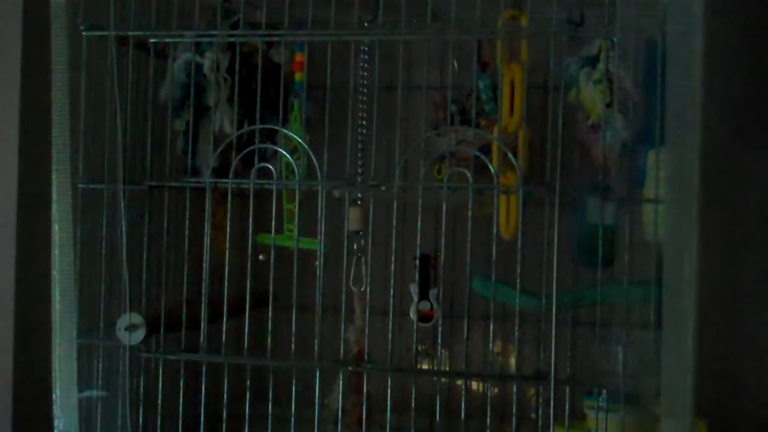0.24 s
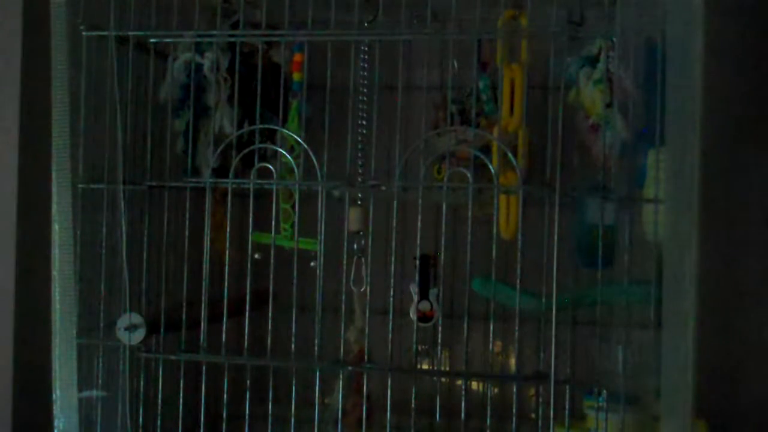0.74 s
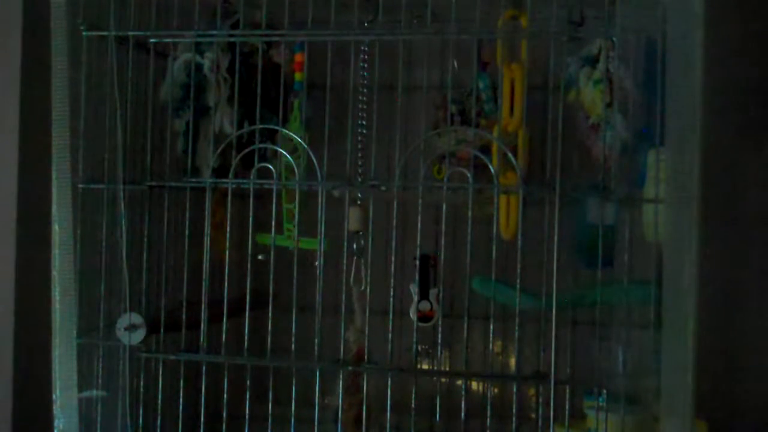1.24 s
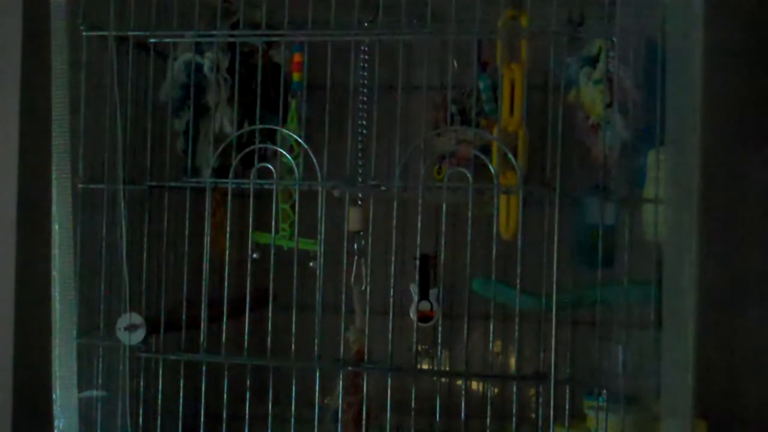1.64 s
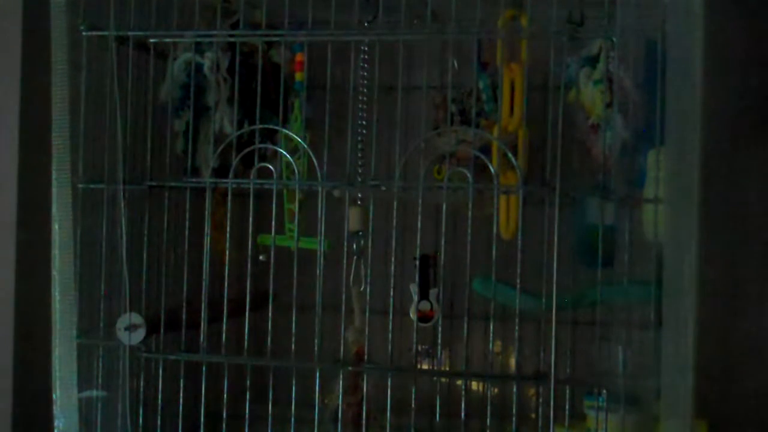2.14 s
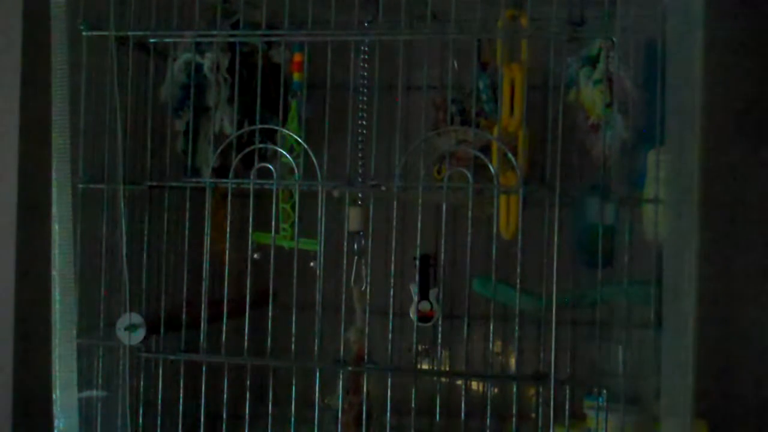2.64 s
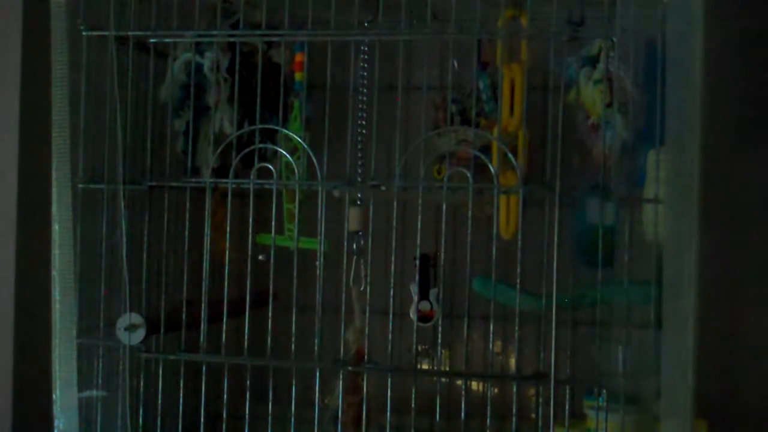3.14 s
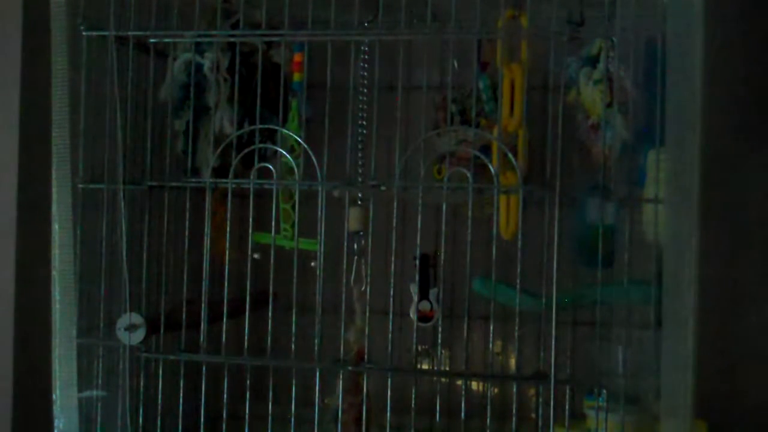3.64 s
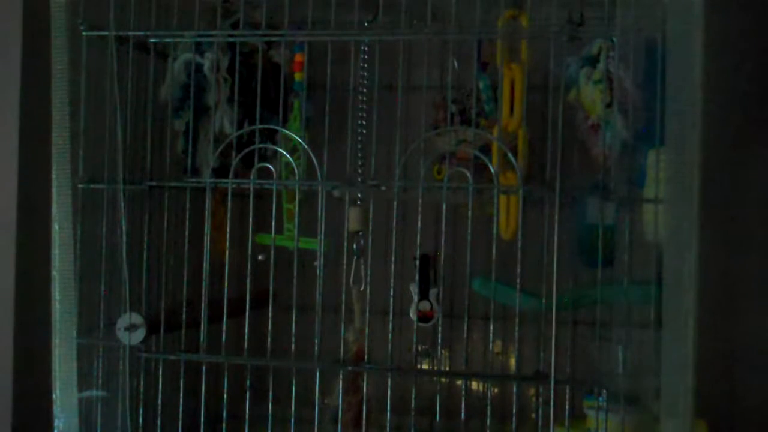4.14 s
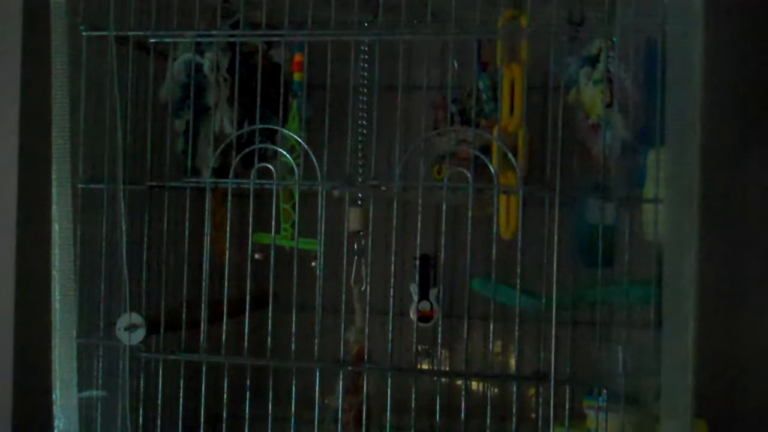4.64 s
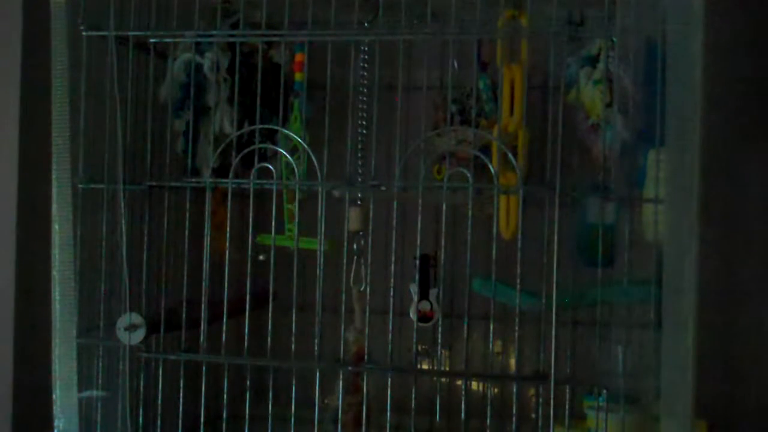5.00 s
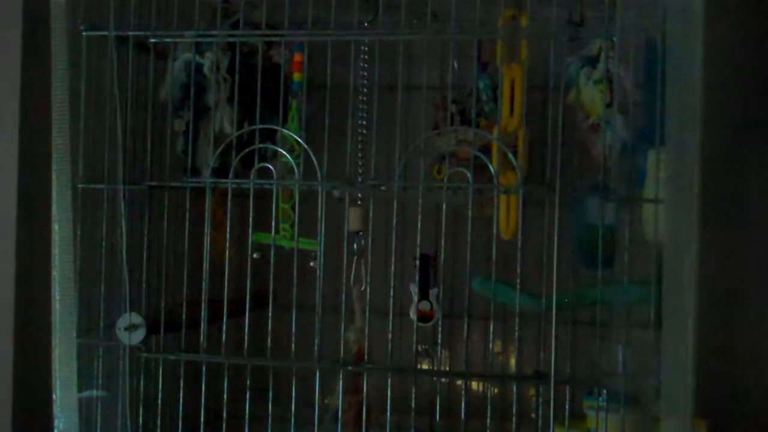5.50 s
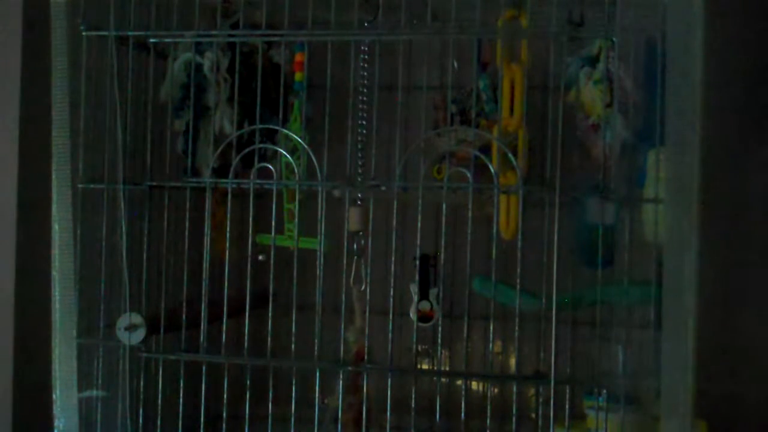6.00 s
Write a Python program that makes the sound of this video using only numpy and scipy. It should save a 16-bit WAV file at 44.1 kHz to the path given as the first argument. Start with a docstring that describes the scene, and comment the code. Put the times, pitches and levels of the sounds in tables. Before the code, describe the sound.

A small bird flutters and scrabbles in a wire cage in two bouts, with sharp knocks and dull thuds, then settles in a quiet room.

```python
"""A small bird in a wire cage

The bird flutters and scrabbles in two bouts, then only stirs now and then. Feathers brush the bars,
claws tick and squeak on them, hard knocks ring the plastic tray and the wire frame, and a toy clinks.
Dull thuds boom in the quiet room. A phone's two microphone ports hear it over a hush and a thin whine."""
import sys
import numpy as np
from scipy import signal
from scipy.fft import rfft, irfft
from scipy.io import wavfile
from scipy.ndimage import uniform_filter1d

SR = 44100
rng = np.random.default_rng(int(sys.argv[2]) if len(sys.argv) > 2 else 0)


def to_wav(s):
    """Save 16-bit WAV."""
    ch = np.atleast_2d(s).T  # columns
    pcm = np.round(np.clip(ch, -1, 1) * 32767)  # PCM
    wavfile.write(sys.argv[1], SR, pcm.astype(np.int16))


N = 276066
T = np.arange(N) / SR
FREQS = np.maximum(np.arange(N // 2 + 1) * SR / N, 1)
CONTACT_S = 0.0025  # how long a hard touch takes to build up

# the bright hiss of something rubbing on the bars: f/Hz, level/dB
HISS_SPECTRUM = [(300, -36), (1500, -14.5), (3000, -7.5), (5000, -5.5), (6800, 4), (8000, 1.5),
                 (10000, -12.5), (12000, -20), (14500, -30.5)]
# the lower, papery body of that sound: f/Hz, level/dB
BODY_SPECTRUM = [(30, -35), (60, -8.5), (85, -16.5), (130, -16), (200, -10.5), (300, -2.5), (450, -3),
                 (650, 0.5), (1400, 0), (2500, -3), (4000, -8), (8000, -23)]


def amp(db):
    """Turn decibels into a factor to multiply by."""
    return 10 ** (np.asarray(db) / 20)


def unit(x):
    """Scale a sound so that its average level (rms) is 1."""
    return x / np.sqrt(np.mean(x ** 2))


def along(points, hz=FREQS):
    """Read a curve of (frequency, value) points, with octaves evenly spaced."""
    f, value = np.transpose(points)
    return np.interp(np.log(hz), np.log(f), value)


def shape(x, gain):
    """Filter a sound with one gain for each frequency."""
    return irfft(rfft(x) * gain, N)


def band(hz, q):
    """The gain of a resonance at hz; a higher q makes it narrower."""
    return 1 / (1 + 1j * q * (FREQS / hz - hz / FREQS))


def noise():
    """Two unrelated noises: mid (what left and right share) and side (how they differ)."""
    return rng.standard_normal((2, N))


def coloured(spectrum):
    """Noise of level 1 with the given spectrum."""
    return unit(shape(noise(), amp(along(spectrum))))


def crackle(spectrum, per_s):
    """Many tiny clicks of random size, with the given spectrum."""
    clicks = noise() * (rng.random(N) < per_s / SR)
    return unit(shape(clicks, amp(along(spectrum))))


def swell(t, half_s):
    """A rounded rise and fall that peaks at time t and is about half as high half_s away."""
    return np.exp(1 - np.sqrt(1 + np.minimum(2 * ((T - t) / half_s) ** 2, 1e4)))


def strike(t, rise, t60, hold=0):
    """Rise at time t, hold, then fade; t60 is the time it takes to fade by 60 dB."""
    age = np.maximum(T - t, 0)
    fade = np.log(1000) * np.maximum(age - rise - hold, 0) / t60
    return np.minimum(age / rise, 1) * np.exp(-np.minimum(fade, 100))


def ring(modes, t, rise):
    """An object struck at time t rings with its own fading tones, called modes."""
    start = int(t * SR)
    age = np.arange(min(SR, N - start)) / SR
    hz, db, t60 = np.transpose(modes)[:, :, None]
    tones = amp(db) * np.sin(2 * np.pi * (hz * age + rng.random(hz.shape)))
    fading = (tones * np.exp(-np.log(1000) * age / t60)).sum(0)
    start_level = np.sqrt(np.sum(amp(db) ** 2) / 2)
    out = np.zeros(N)
    out[start:start + len(age)] = fading * np.minimum(age / rise, 1) / start_level
    return out


def background():
    """The steady hush of the room and the thin whine of the electronics."""
    # the hush: f/Hz, level/dB
    hush_spectrum = [(15, -49), (25, -13), (160, -2.5), (202, -1), (372, -4), (554, -2), (722, -3.5),
                     (824, -3.5), (1470, -8.5), (7220, -18), (7820, -12), (8930, -19), (14000, -19)]
    # the whine's tones: f/Hz, level/dB, left minus right/dB, pitch wander/Hz
    whine_tones = [(8000, -76, 8, 1), (7870, -79, 8, 35), (11807, -80.5, 0, 1)]
    hush = amp(-62) * coloured(hush_spectrum)
    out = ports(hush, along([(100, 5), (1000, 9.5), (4000, 2), (6500, -0.5), (9000, 4), (14000, -2.5)]))
    for hz, db, pan_db, wander_hz in whine_tones:
        drift = wander_hz * unit(uniform_filter1d(noise()[0], 300))
        tone = np.sqrt(2) * np.sin(2 * np.pi * np.cumsum(hz + drift) / SR)
        out = out + amp(db + np.array([[pan_db], [-pan_db]]) / 2) * tone
    return out


def scrabbling(stroke_half_s):
    """How loud the bird's fidgeting is over time: each bout builds up, holds and dies away."""
    # restless bouts: full effort from/s, until/s, level/dB, dying away/(dB per s)
    bouts = [(0, 1.12, -47.5, 16.5), (2.698, 2.88, -48, 50)]
    rousing_db_per_s, strokes_per_s = 76.5, 14
    effort = sum(amp(db - rousing_db_per_s * np.maximum(start - T, 0) - dying * np.maximum(T - end, 0))
                 for start, end, db, dying in bouts)
    # the pressure of feathers on wire flickers by a couple of decibels
    rub = amp(2 * unit(uniform_filter1d(uniform_filter1d(noise()[0], 400), 400)))
    light_strokes = sum(amp(1 + 12.5 * size) * swell((k + 0.5 * late) / strokes_per_s, stroke_half_s)
                        for k, (late, size) in enumerate(rng.uniform(-1, 1, (64, 2))))
    return effort * np.hypot(rub, light_strokes)


def feathers():
    """Each stroke drags a feather's many tiny barbs over the bars: a hiss with a papery body."""
    # strokes that stand out from the scrabbling: peak t/s, hiss level/dB, body minus hiss/dB
    strokes = [(0.02, -53.5, 17), (0.07, -39.5, 3), (0.138, -29, -3), (0.197, -36, -7), (0.291, -31, -2.5),
               (0.611, -32, 1.5), (0.648, -35.5, -0.5), (0.714, -40.5, 2.5), (0.775, -35.5, 6),
               (0.943, -41.5, -2), (1.119, -42, 1), (1.689, -38, -10), (1.766, -44.5, -11),
               (1.932, -46.5, -5), (2.179, -53.5, 2), (2.331, -53, -6), (2.555, -51, 3.5),
               (2.623, -43, 4.5), (2.715, -38, 2), (2.752, -41.5, 0.5), (2.771, -37.5, -1.5),
               (2.805, -33.5, 4), (2.949, -36, -3), (3.121, -52.5, 3.5), (3.18, -61.5, 7), (3.365, -59, 0),
               (3.803, -59.5, -6.5), (3.965, -57, 0.5), (4.35, -53, -7.5), (5.361, -60.5, -2.5)]
    firm_half_s, firm_db = 0.0062, -33
    fidget, hiss_level, body_level = scrabbling(firm_half_s), 0, 0
    for t, db, body_db in strokes:
        half_s = firm_half_s * 2 ** ((firm_db - db) / 14)  # a gentler stroke is slower
        drag = amp(db) * swell(t, half_s)
        hiss_level += drag
        body_level += amp(body_db) * drag
    hiss = np.hypot(amp(0.5) * hiss_level, fidget) * crackle(HISS_SPECTRUM, per_s=4400)
    body = np.hypot(amp(-0.5) * body_level, amp(-2) * fidget) * crackle(BODY_SPECTRUM, per_s=5000)
    return hiss + body


def claw_ticks():
    """Claws and beak tap the bars and set the loose wires buzzing for a moment."""
    # the taps: t/s, level/dB, extra gain for the body/dB
    taps = [(0.01, -18.5, -40), (0.0584, -27.5, -12.5), (0.2458, -28.5, -15.5), (0.417, -32.5, -20),
            (0.5746, -30.5, -12), (0.7634, -28, -9.5), (0.9597, -32.5, 0.5), (1.225, -36.5, -3),
            (1.275, -32.5, -3.5), (1.3122, -29, -3), (1.525, -37.5, -4.5), (1.9599, -39.5, -19),
            (1.9825, -32.5, -5.5), (2.0838, -38.5, -13), (2.111, -43, -14), (2.597, -37.5, -14),
            (2.857, -48, -21), (2.977, -27, -15), (3.5129, -51.5, -8), (3.696, -41, -10.5),
            (4.197, -50.5, -9), (4.886, -55.5, -28)]
    hiss_level, body_level = 0, 0
    for t, db, body_db in taps:
        buzz_s = 0.17 * 2 ** (body_db / 16)  # a tap with more body buzzes longer
        tap = amp(db) * strike(t, CONTACT_S, buzz_s)
        hiss_level += tap
        body_level += amp(body_db) * tap
    return amp(-4) * hiss_level * coloured(HISS_SPECTRUM) + amp(-1) * body_level * coloured(BODY_SPECTRUM)


def quill_snaps():
    """Stiff quills flick off a bar with a very bright rasp."""
    # the flicks: peak t/s, level/dB
    flicks = [(0.132, -38), (1.693, -40), (2.669, -27.5), (2.859, -36), (2.946, -39.5), (2.979, -36)]
    level = sum(amp(db) * swell(t, half_s=0.0047) for t, db in flicks)
    return level * coloured([(3000, 2), (6500, -2), (8000, 15.5), (10500, -2.5), (14000, -4)])


def claw_squeaks():
    """A slipping claw scrapes a wire and stirs two of its resonances, about an octave apart."""
    # the slips: peak t/s, level/dB, f/Hz, half length/s
    slips = [(0.298, -34, 557, 0.013), (0.318, -34, 1570, 0.0033), (.338, -31, 1430, 0.0019),
             (0.388, -29.5, 1380, 0.0024), (0.598, -28, 650, .0035), (0.9645, -25.5, 1900, 0.0028),
             (1.846, -48, 2150, 0.033), (2.806, -33.5, 2000, 0.0087)]
    out, scrape = 0, amp(-8.5) * coloured(HISS_SPECTRUM)
    for t, db, hz, half_s in slips:
        wire = band(hz, q=1.87) ** 2 + amp(-10) * band(2.05 * hz, q=1.87) ** 2
        squeak = unit(shape(noise(), wire))
        out += amp(db) * swell(t, half_s) * (squeak + scrape)
    return out


def thuds():
    """Soft, heavy pushes: a dull burst and a boom that lingers in the room's low tones."""
    # the pushes: t/s, level/dB, centre f/Hz, sharpness q
    pushes = [(.385, -43.5, 430, 3.2), (1.004, -27, 720, 0.82), (1.151, -40, 417, 0.95),
              (1.658, -43, 700, 0.65), (1.755, -54, 333, 1.3), (2.096, -52, 690, 2.5),
              (2.806, -33.5, 470, 1.7), (2.886, -34, 398, 0.86), (3.109, -47, 450, 1.9)]
    # the room's low tones: f/Hz, level/dB, t60/s
    room_modes = [(84, -4, 0.94), (179, -9.5, 0.48), (234.6, -5, 1), (255, 0, 0.95), (290.5, 3, 0.67),
                  (323, -1.5, 1), (405.4, -2.5, 1), (411.5, 3.5, 0.84), (445, 1, 0.8), (466, -29, .5),
                  (640, -13, .45), (692, 8.5, 0.45), (821, -8, 0.19), (910, -33, .4), (1000, 0, 0.94),
                  (1200, 3, 0.63)]
    out, bass_cut = 0, 1 / (1 + (230 / FREQS) ** 8)
    for t, db, hz, q in pushes:
        push_s = 0.019 * 2 ** ((db + 29.5) / 13)  # a heavier push lasts longer
        # tones far from the thud's centre frequency ring less
        modes = [(f, level - 10 * np.log10(1 + (q * (f / hz - hz / f)) ** 2), t60)
                 for f, level, t60 in room_modes]
        dull_noise = unit(shape(noise(), band(hz, q) ** 2 * bass_cut))
        burst = dull_noise * strike(t, push_s / 2, t60=0.53, hold=push_s)
        boom = ring(modes, t, push_s / 2)
        out += amp(db) * (amp(-5.5) * boom + amp(-4.5) * burst)
    return out


def knocks(blows, modes):
    """A bright scrape leads each blow; the struck part rings and the bars rattle on."""
    rattle = coloured([(1500, -16), (3200, -9), (4500, -4), (5500, -4.5), (7000, 1), (8200, -4),
                       (10000, -15.5), (14000, -27.5)])
    clatter = band(1125, q=0.84) ** 2 + amp(-1) * band(1990, q=3) ** 2
    out = 0
    for t, db, scrape_db, t60, cutoff_hz in blows:
        fade = strike(t, CONTACT_S, t60)
        tones = np.array([ring(modes, t, CONTACT_S) for _ in range(2)])
        body = amp(-0.5) * tones + amp(-3) * fade * unit(shape(noise(), clatter))
        first_touch = strike(t - 0.0018, CONTACT_S, t60=0.02)
        scrape = amp(scrape_db) * (first_touch + amp(-3.5) * fade) * rattle
        # a softer blow has a lower cut-off, which dulls both parts
        body = shape(body, 1 / (1 + (FREQS / cutoff_hz) ** 4))
        scrape = shape(scrape, 1 / (1 + (FREQS / (3 * cutoff_hz)) ** 4))
        out += amp(db) * (body + scrape)
    return out


def tray_knocks():
    """A quick double knock rings the plastic tray."""
    # blows on the tray: t/s, level/dB, extra gain for the scrape/dB, rattle t60/s, cut-off f/Hz
    blows = [(1.3363, -17.5, 1, 0.2, 6100), (1.3579, -32, -1.5, 0.082, 1700)]
    # the tray's tones: f/Hz, level/dB, t60/s
    tray_modes = [(320, -2, .15), (440, -9, .2), (689, -9, .17), (892, -1, .13), (980, -1, .16),
                  (1063, -3, .13), (1165, -2, .18), (1391, -3, .18), (1452, -3, .15), (1928, -3, .11),
                  (1978, -1, .1), (2120, 0, .1), (2199, -1, .11), (2402, -4, .1), (2548, -5, .1),
                  (6060, -6, .13), (6385, -4, .15), (7400, -4, .14)]
    return knocks(blows, tray_modes)


def frame_knocks():
    """Three knocks, each softer than the last, briefly ring the wire frame."""
    # blows on the frame: t/s, level/dB, extra gain for the scrape/dB, rattle t60/s, cut-off f/Hz
    blows = [(2.6642, -26, -0.5, 0.099, 6060), (3.278, -36, -9, 0.07, 2150), (3.297, -47, -12, 0.055, 1500)]
    # the frame's tones: f/Hz, level/dB, t60/s
    frame_modes = [(650, 3, 0.058), (1008, -2.5, 0.08), (1360, -18, 0.088), (1760, 4, 0.047),
                   (1980, -10, 0.07), (2500, -9, 0.079), (2910, 2, 0.061)]
    return knocks(blows, frame_modes)


def toy_clinks():
    """A small hanging toy rings when the stirring bird touches it."""
    # the touches: t/s, level/dB
    touches = [(4.32, -56), (4.337, -57), (5.343, -62.5)]
    # the toy's tones: f/Hz, level/dB, t60/s
    toy_modes = [(1360, -1, .15), (1620, -10, .3), (2200, -5, .15), (3450, -6, .25), (4430, 0, .1)]
    return sum(amp(db) * ring(toy_modes, t, CONTACT_S) for t, db in touches)


def ringing_bars(x):
    """The cage's bars pick up a sound and ring on faintly."""
    # the bars' tones: f/Hz, level/dB, t60/s
    bar_modes = [(1370, -7, .15), (1600, -5, .6), (1655, -6, .6), (2530, -8, .4), (3250, -5, .7),
                 (3310, -2, .8), (4430, -7, .2), (5281, -7, .4)]
    resonances = sum(amp(db) * band(hz, q=np.pi * hz * t60 / np.log(1000)) for hz, db, t60 in bar_modes)
    return x + shape(x, resonances)


def room(x, echo_db):
    """A small furnished room adds a smooth tail of echoes whose treble dies first."""
    # how long the echoes last: f/Hz, t60/s
    fade_times = [(100, 0.99), (400, 0.63), (1500, 0.4), (6000, 0.17), (14000, 0.33)]
    centres_hz = np.geomspace(50, 16000, 9)
    source, tail = noise(), 0
    for k, hz in enumerate(centres_hz):
        share = np.interp(np.log(FREQS), np.log(centres_hz), np.arange(len(centres_hz)) == k)
        tail += shape(source, share) * strike(0.0054, rise=0.0055, t60=along(fade_times, hz))
    tail = tail[:, :SR] / np.sqrt(np.sum(tail ** 2) / 2)
    return x + amp(echo_db) * signal.fftconvolve(x, tail, axes=1)[:, :N]


def ports(x, left_minus_right_db):
    """Two close microphone ports hear much the same low notes, unrelated treble and their own colour."""
    # how much the two ports differ: f/Hz, side minus mid/dB
    side_levels = [(30, 8), (100, -10), (300, -18.5), (700, -13.5), (1400, -10), (2500, -4.5), (5000, -0.5),
                   (14000, -0.5)]
    mid, side = x[0], shape(x[1], amp(along(side_levels)))
    balance = amp(np.array([left_minus_right_db, -left_minus_right_db]) / 2)
    balance /= np.sqrt(np.mean(balance ** 2, axis=0))
    left_lag_s = 0.00003 / (1 + FREQS / 4000)
    delay = np.exp(np.array([[-1j], [1j]]) * np.pi * FREQS * left_lag_s)
    return shape(np.array([mid + side, mid - side]), delay * balance)


def scene():
    """The bird and its cage in the room, heard in left and right."""
    # the ports' own resonances favour one side: f/Hz, left minus right/dB
    port_balance = [(100, -2.5), (1500, -1.5), (4500, -1), (6500, -7), (7300, 1), (8200, 13), (10000, 6.5),
                    (12000, 11), (14000, 17.5)]
    bird = room(ringing_bars(feathers() + claw_ticks() + quill_snaps()), echo_db=-5)
    bird = shape(bird, 1 / np.sqrt(1 + (60 / FREQS) ** 4))  # little deep bass comes through
    cage = room(tray_knocks() + frame_knocks() + claw_squeaks() + toy_clinks(), echo_db=-13.5)
    cage = shape(cage, (FREQS / (FREQS - 130j)) ** 2)  # the cage's sounds carry little bass either
    return ports(bird + cage + thuds(), along(port_balance)) + background()


def record(dry):
    """The phone cuts off the highest treble."""
    top_hz = 14300
    return signal.sosfilt(signal.ellip(10, 0.2, 70, top_hz, fs=SR, output="sos"), dry)


dry = scene()
out = record(dry)
to_wav(out)
```